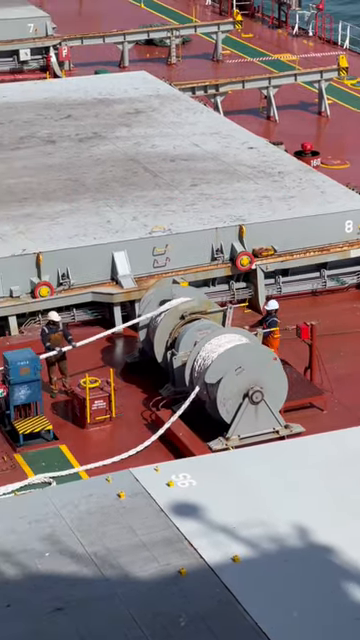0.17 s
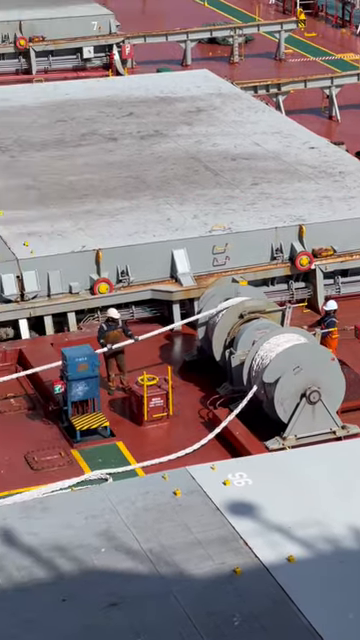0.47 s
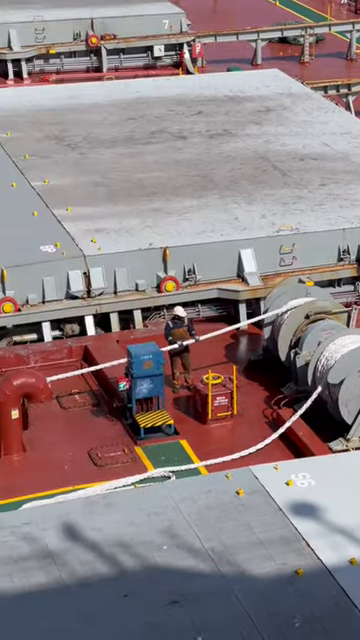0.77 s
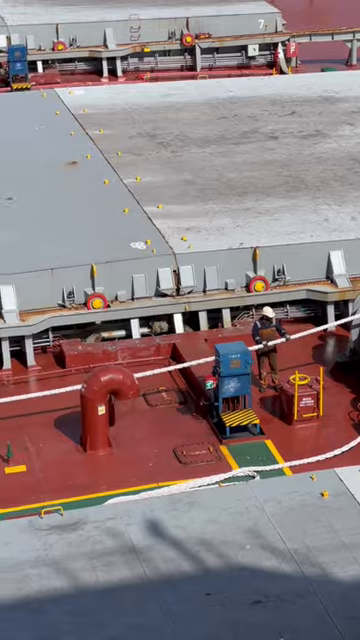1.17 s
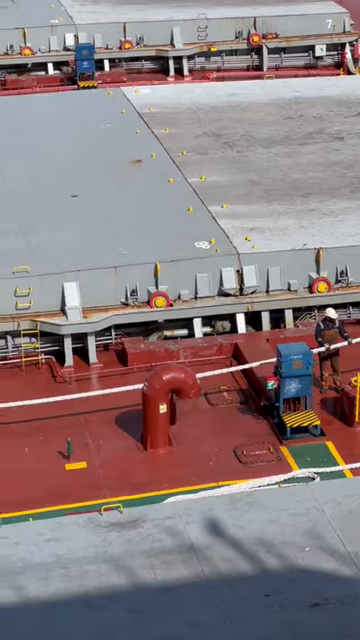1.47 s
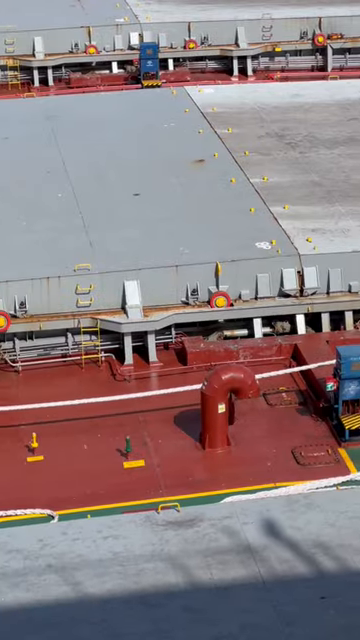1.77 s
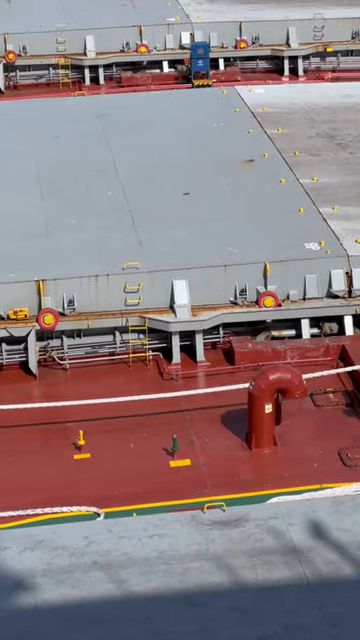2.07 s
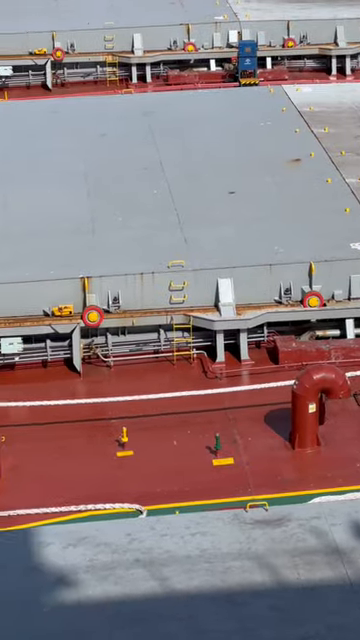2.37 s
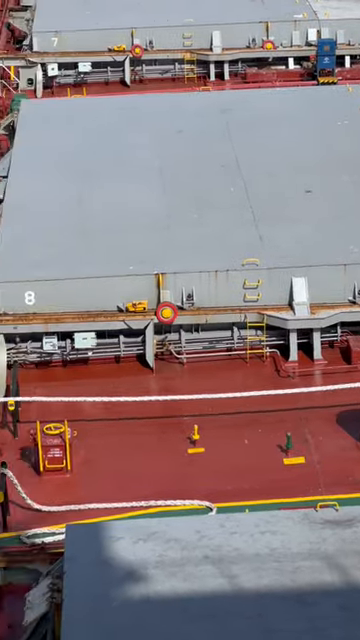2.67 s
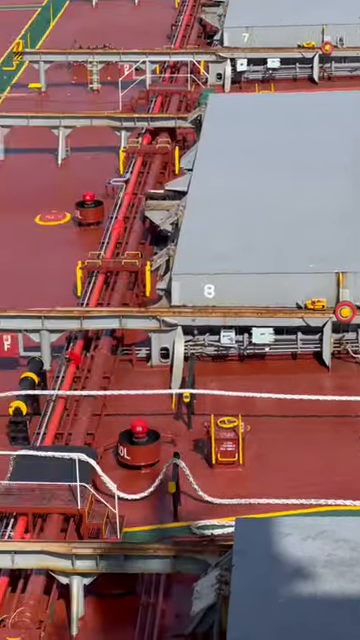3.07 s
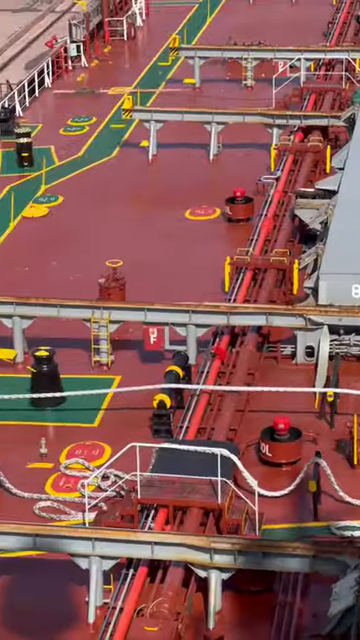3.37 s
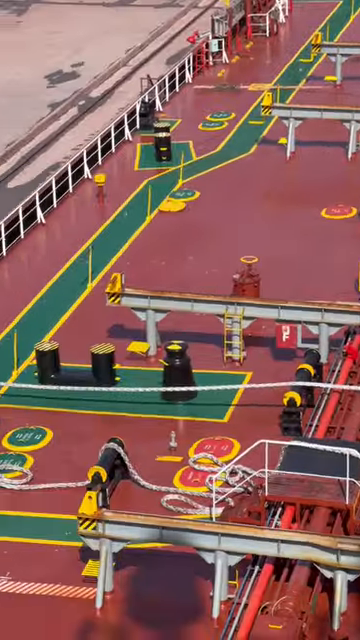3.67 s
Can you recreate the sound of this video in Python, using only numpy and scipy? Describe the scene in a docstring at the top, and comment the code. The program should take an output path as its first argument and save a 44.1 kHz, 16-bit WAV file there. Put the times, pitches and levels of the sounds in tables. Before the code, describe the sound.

Wind rumbles and thumps in irregular bursts above a constant dull machinery and sea hiss

```python
"""Wind high above a ship's deck

Gusts buffet the microphone: noise shaped into a low rumble, under clumps of short pressure wavelets (thumps).
Behind it is the steady roar and hiss of ventilation and sea, made of coloured noise.
A rotor swishes in cycles: a band of noise sweeps in pitch while fixed bands pulse in level once a turn.
A pump whines faintly: a few wavering sine overtones that fade as we turn away from it."""
import sys
import numpy as np
from scipy import signal
from scipy.fft import rfft, irfft, next_fast_len
from scipy.io import wavfile
from scipy.ndimage import uniform_filter1d, map_coordinates

SR = 44100
rng = np.random.default_rng(int(sys.argv[2]) if len(sys.argv) > 2 else 0)


def generate_wav(signal):
    """Clip the signal to [-1, 1] and save it as 16-bit WAV at the path in sys.argv[1]."""
    frames = np.transpose(np.atleast_2d(signal))
    scaled = np.clip(frames, -1, 1) * 32767
    pcm = np.round(scaled).astype(np.int16)
    wavfile.write(sys.argv[1], SR, pcm)


N = 168021  # length in samples

# How hard the wind blows; EDDY_TRIM_DB and FLUTTER_TRIM_DB are added later to their columns:
# (t/s, eddies between puffs level/dB, rumble level/dB, flutter level/dB)
GUST_LEVELS = [(0.0, -45, -40, -38.5), (0.12, -45, -32, -53), (0.38, -41.5, -34.5, -50.5),
               (0.88, -37, -37, -42), (1.16, -36.5, -30, -47), (1.7, -48.5, -40.5, -53),
               (2.08, -37.5, -35, -46), (2.59, -31.5, -34.5, -39), (2.64, -50, -25, -49),
               (2.68, -40.5, -34.5, -57), (3.06, -33, -34.5, -57), (3.09, -31, -22, -49),
               (3.19, -46, -36, -47), (3.23, -27, -28, -37), (3.31, -27, -33, -37), (3.35, -35, -22.5, -35),
               (3.44, -29.5, -26.5, -37), (3.81, -36.5, -28, -37)]
# Puffs of wind, before the core and churn offsets below: (t/s, length/s, thump level/dB, flutter level/dB)
WIND_PUFFS = [(0.028, 0.029, -36, -44), (0.12, 0.043, -25.5, -37), (0.167, 0.0078, -21.5, -25),
              (0.223, 0.018, -39.5, -43), (0.535, 0.023, -34, -47), (0.706, 0.018, -27.5, -58),
              (0.753, 0.006, -35, -34.5), (0.788, 0.016, -29, -40), (0.981, 0.013, -23.5, -41),
              (1.025, 0.019, -30.5, -36), (1.05, 0.019, -31, -46), (1.12, 0.007, -29.5, -39),
              (1.17, 0.012, -26, -40), (1.217, 0.014, -19.5, -23), (1.334, 0.012, -36.5, -52),
              (1.479, 0.041, -27, -50), (1.564, 0.032, -31.5, -57), (1.717, 0.005, -33.5, -48),
              (1.822, 0.035, -30.5, -44), (1.885, 0.018, -33.5, -46), (1.97, 0.046, -29.5, -43),
              (2.131, 0.026, -24.5, -39), (2.197, 0.015, -25.5, -39), (2.223, 0.014, -22.5, -24),
              (2.266, 0.018, -17.5, -33), (2.373, 0.0089, -32.5, -60), (2.407, 0.0099, -35, -66),
              (2.462, 0.019, -25, -47), (2.59, 0.0046, -25, -45), (2.644, 0.021, -19.5, -39),
              (2.692, 0.011, -31, -48), (2.774, 0.018, -24, -33), (2.835, 0.008, -33, -38),
              (2.925, 0.019, -21.5, -29), (3.01, 0.022, -29, -50), (3.095, 0.03, -23.5, -37),
              (3.13, 0.015, -25, -41), (3.237, 0.016, -27, -42), (3.269, 0.037, -23, -25.5),
              (3.357, 0.033, -22, -27.5), (3.392, 0.016, -24, -25), (3.436, 0.02, -26, -31),
              (3.486, 0.0095, -28, -28), (3.521, 0.01, -25, -20.5), (3.549, 0.01, -27, -21),
              (3.596, 0.015, -25, -46), (3.65, 0.0085, -23, -53), (3.682, 0.012, -29, -30),
              (3.72, 0.032, -22, -24.5), (3.77, 0.014, -24.5, -28), (3.796, 0.013, -26.5, -25.5)]
# Soft side-only swells of wind eddies, independent of the centre puffs: (t/s, length/s, level/dB)
SIDE_SWELLS = [(0.234, 0.029, -47), (0.928, 0.042, -42.5), (1.3, 0.069, -42.5), (2.346, 0.14, -45),
               (3.536, 0.021, -58)]
# Tone colour of the rumble; only the shape counts: (f/Hz, level per Hz/dB)
RUMBLE_COLOUR = [(15, -41), (25, -23), (49, -1), (81, 2), (220, -7), (290, -40), (480, -120)]
# Tone colour of the roar in the centre; only the shape counts: (f/Hz, level per Hz/dB)
ROAR_COLOUR = [(30, -120), (100, -2), (300, -0.5), (600, -7), (900, -9.5), (1300, -9.5), (1600, -12.5),
               (3000, -18), (4150, -23), (4780, -25), (4930, -30.5), (5000, -40), (5110, -29.5),
               (5290, -26), (6300, -24.5), (7400, -26.5), (8800, -33.5), (9400, -32.5), (10800, -36.5),
               (11650, -41.5), (12100, -120)]
# Bands of side hiss that widen the roar; the gaps between them sound mono.
# Only the shape counts: (f/Hz, level per Hz/dB)
SIDE_HISS_BANDS = [(30, -120), (100, -16), (400, -3.5), (1000, -1.5), (1500, -8), (2000, -21), (2300, -49),
                   (2450, -68), (4120, -70), (4230, -29), (5020, -16), (5650, -28.5), (5780, -70),
                   (7520, -70), (7620, -29), (9200, -26.5), (11100, -25), (12000, -33), (15700, -30)]
# Fixed bands of the rotor, before their pulsing: (f/Hz, width/Hz, centre level/dB, side level/dB)
ROTOR_BANDS = [(4000, 45, -72, -120), (4190, 45, -72, -120), (9305, 35, -78, -81), (9754, 50, -84, -87),
               (10450, 500, -80, -84)]
# Overtones of the pump, before fade and wavering: (multiple of PUMP_HZ, centre level/dB, side level/dB)
PUMP_OVERTONES = [(2, -68, -52.5), (3, -61, -57), (4, -67, -67), (5, -60, -71.5), (6, -69, -79),
                  (7, -72.5, -76)]
# Turning away from the pump: (t/s, level change/dB)
PUMP_FADE = [(0, 1), (2.4, 0), (2.9, -5.5), (3.81, -29)]

# Eddies: middle pitch, spread of its logarithm, length in cycles, scatter of size
EDDY_HZ, EDDY_SPREAD, EDDY_CYCLES, EDDY_SCATTER_DB = 277, 0.34, 0.63, 2
EDDIES_PER_S = 500
FLUTTER_HZ, FLUTTER_SPREAD = 537, 0.27  # the smallest eddies
EDDY_TRIM_DB, FLUTTER_TRIM_DB = -2.5, -7
LOG_PITCH_PER_DB = -0.01  # eddies are a little lower in pitch where the level is high
CORE_CYCLES, CORE_DB = 0.68, 7.5  # core of a puff: length in cycles, peak over the puff's level
SHARP_S = 0.012  # longer puffs have a weaker core
CORE_RISE_PER_DB = 0.012  # the flutter core of a harder puff is higher (log pitch)
CHURN_DB, CHURN_LONGER = -3.5, 1.233  # eddies churned up by a puff: level change, length factor
SIDE_RUMBLE_DB = -67  # the part of the rumble that differs between left and right
ROAR_DB, SIDE_HISS_DB = -43, -50
TURNS_PER_S = 6.09  # rotor speed
SWEEP_TOP_TURN, PULSE_TOP_TURN = 0.06, 0.6  # where in a turn the sweep is highest, the bands loudest
SWEEP_HZ, SWEEP_SWING_HZ, SWEEP_WIDTH_HZ, SWEEP_DB = 6250, 600, 620, -67.5
PULSE_DB = 6  # swing of the fixed bands, up and down
PUMP_HZ = 269.1
LOW_CUT_HZ, TOP_HZ = 15, 15750


def amp(db):
    """Turn decibels into a plain factor."""
    return 10 ** (np.asarray(db) / 20)


def unit(x):
    """Scale x to an average strength (rms) of 1."""
    return x / np.sqrt(np.mean(x ** 2) + 1e-20)


def curves(rows):
    """One value per sample for each column after the time."""
    s, *cols = np.transpose(rows)
    return [np.interp(np.arange(N) / SR, s, c) for c in cols]


def wobble(rate):
    """A smooth random curve through `rate` random points a second."""
    points = rng.standard_normal(int(N * rate / SR) + 4)
    return map_coordinates(points, [np.arange(N) * rate / SR])


def filtered(x, response):
    """Make each frequency of x louder or softer by response(Hz)."""
    m = next_fast_len(N + SR // 2)
    return irfft(rfft(x, m) * response(np.fft.rfftfreq(m, 1 / SR)), m)[..., :N]


def rush(colour, patchy_db):
    """Coloured noise of rms 1, with random patches in time and pitch louder or softer."""
    z = signal.stft(rng.standard_normal(N + 512), nperseg=512)[2]
    patches = uniform_filter1d(rng.standard_normal(z.shape), size=5, axis=0)  # smooth over pitch
    patches = uniform_filter1d(patches, size=10, axis=1)  # smooth over time
    noise = signal.istft(z * amp(patchy_db * unit(patches)), nperseg=512)[1][:N]
    f, db = np.transpose(colour)
    return unit(filtered(noise, lambda hz: amp(np.interp(np.log(hz + 1), np.log(f + 1), db))))


def bells(s, length, db):
    """Power of bell-shaped swells centred at the times s; length is the width at half power."""
    t = np.arange(N) / SR
    return sum(amp(2 * d) * np.exp(-4 * np.log(2) * ((t - at) / w) ** 2)
               for at, w, d in zip(s, length, db))


def narrow(hz, width_hz):
    """Two independent narrow bands of noise, rms 1 taken together."""
    noise = rng.standard_normal((2, N))
    return unit(filtered(noise, lambda f: np.exp(-2 * ((f - hz) / width_hz) ** 2)))


def wavelets(s, size, hz, cycles, phase):
    """Short pressure waves, each under a bell-shaped outline centred at its time s."""
    k = np.arange(-900, 900)  # samples around the centre
    u = k / SR * hz[:, None]  # cycles from the centre
    outline = size[:, None] * np.exp(-0.5 * (u / cycles) ** 2)
    waves = outline * np.cos(2 * np.pi * u + phase[:, None])
    at = np.round(s * SR).astype(int)[:, None] + k + len(k)
    return np.bincount(at.ravel(), waves.ravel(), N + 2 * len(k))[len(k):][:N]


def eddies(level_db, centre_hz, spread):
    """A dense stream of small eddies bursting on the port, each one a random wavelet."""
    count = int(EDDIES_PER_S * N / SR)
    s = rng.uniform(0, N / SR, count)
    gust_db = level_db[(s * SR).astype(int)] - level_db.mean()
    hz = centre_hz * np.exp(spread * rng.standard_normal(count) + LOG_PITCH_PER_DB * gust_db)
    size = amp(EDDY_SCATTER_DB * rng.exponential(size=count))
    phase = rng.uniform(0, 2 * np.pi, count)
    stream = wavelets(s, size, np.clip(hz, 80, 850), EDDY_CYCLES, phase)
    return unit(stream) * amp(level_db)


def puffs_and_eddies(calm_db, peak_db, centre_hz, spread, core_log_pitch):
    """Each puff hits as one strong wavelet and churns up eddies, which join those between puffs."""
    s, length, *_ = np.transpose(WIND_PUFFS)
    churn_power = bells(s, CHURN_LONGER * length, peak_db + CHURN_DB)
    level_db = 10 * np.log10(amp(2 * calm_db) + churn_power)
    size = amp(peak_db + CORE_DB) * SHARP_S / np.maximum(length, SHARP_S)
    hz = centre_hz * np.exp(0.1 * rng.standard_normal(len(s)) + core_log_pitch)
    phase = np.pi * rng.standard_normal(len(s))
    return wavelets(s, size, hz, CORE_CYCLES, phase) + eddies(level_db, centre_hz, spread)


def buffeting():
    """Wind pressure on the microphone, nearly the same in both channels: (centre, side)."""
    eddy_db, rumble_db, flutter_db = curves(GUST_LEVELS)
    _, _, thump_db, top_db = np.transpose(WIND_PUFFS)
    rumble = rush(RUMBLE_COLOUR, patchy_db=1) * amp(rumble_db + 2.1 * wobble(21.99))
    thumps = puffs_and_eddies(eddy_db + EDDY_TRIM_DB, thump_db, EDDY_HZ, EDDY_SPREAD, 0.12)
    rise = CORE_RISE_PER_DB * (top_db - top_db.mean())
    flutter = puffs_and_eddies(flutter_db + FLUTTER_TRIM_DB, top_db, FLUTTER_HZ, FLUTTER_SPREAD, rise)
    side_swell = np.sqrt(bells(*np.transpose(SIDE_SWELLS)))
    side_eddies = side_swell * eddies(np.zeros(N), 310, 0.58)
    side_rumble = amp(SIDE_RUMBLE_DB + 2.8 * wobble(8)) * rush(RUMBLE_COLOUR, patchy_db=0)
    return np.array([rumble + thumps + flutter, side_eddies + side_rumble])


def roar():
    """Steady far roar and hiss of ventilation and sea, widened by side hiss: (centre, side)."""
    centre = amp(ROAR_DB) * rush(ROAR_COLOUR, patchy_db=0.71)
    side = amp(SIDE_HISS_DB) * rush(SIDE_HISS_BANDS, patchy_db=0.5)
    return np.array([centre, side])


def rotor():
    """Hiss sweeps up and down once a turn; fixed bands are loudest near its lowest: (centre, side)."""
    turn = TURNS_PER_S * np.arange(N) / SR
    swing = np.cos(2 * np.pi * (turn - SWEEP_TOP_TURN)) + wobble(10) / 3
    hz = SWEEP_HZ + SWEEP_SWING_HZ * swing.clip(-1, 1.5)
    phase = 2 * np.pi * np.cumsum(hz) / SR
    a, b = narrow(0, SWEEP_WIDTH_HZ)  # slow noise, carried up to the moving pitch
    sweep = amp(SWEEP_DB + 2.5 * wobble(25)) * (a * np.cos(phase) + b * np.sin(phase))
    pulse_db = PULSE_DB * (np.cos(2 * np.pi * (turn - PULSE_TOP_TURN)) - 0.4)
    bands = sum(amp([[mid_db], [side_db]] + pulse_db + 2.4 * wobble(5.77)) * narrow(hz, width_hz)
                for hz, width_hz, mid_db, side_db in ROTOR_BANDS)
    return bands + sweep * [[1], [0]]  # the sweep is in the centre only


def pump():
    """Thin, slightly wavering overtones of a hydraulic pump: (centre, side)."""
    angle = 2 * np.pi * PUMP_HZ * np.arange(N) / SR + 0.3 * wobble(2.94)
    fade_db, = curves(PUMP_FADE)
    whine = np.zeros((2, N))
    for k, mid_db, side_db in PUMP_OVERTONES:
        level_db = [[mid_db], [side_db]] + fade_db + 1.0 * wobble(8.9)
        tone = np.sin(k * angle + rng.uniform(0, 2 * np.pi, (2, 1)))
        whine += np.sqrt(2) * amp(level_db) * tone  # sqrt(2): sine of rms 1
    return whine


def scene():
    """Add all sources, then turn centre and side into left and right."""
    mid, side = buffeting() + roar() + rotor() + pump()
    return np.array([mid + side, mid - side])


def record(dry):
    """The microphone drops the deepest bass; nothing is kept above the band limit."""
    return filtered(dry, lambda hz: (hz < TOP_HZ) * hz ** 2 / np.hypot(hz ** 2, LOW_CUT_HZ ** 2))


dry = scene()
out = record(dry)
generate_wav(out)
```